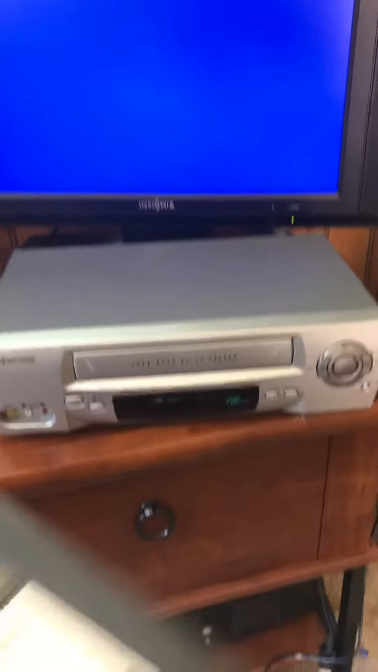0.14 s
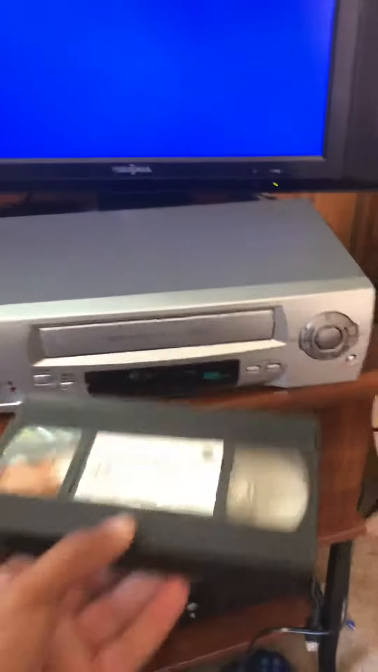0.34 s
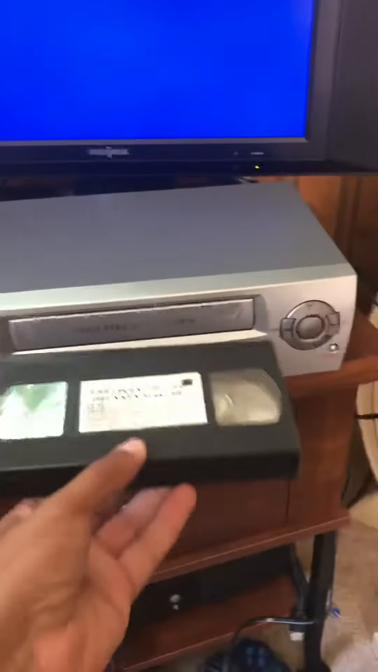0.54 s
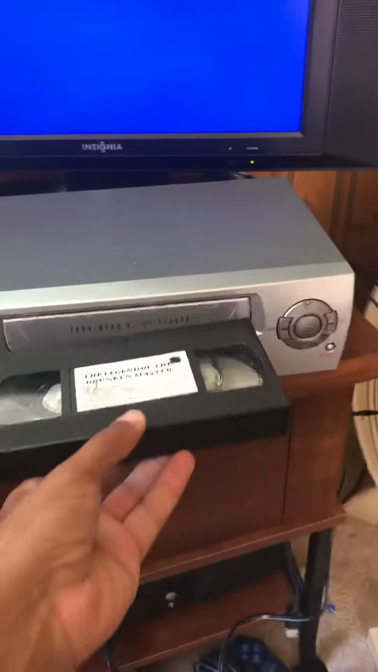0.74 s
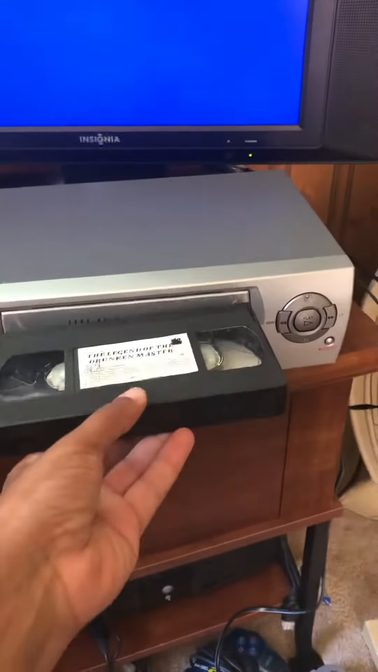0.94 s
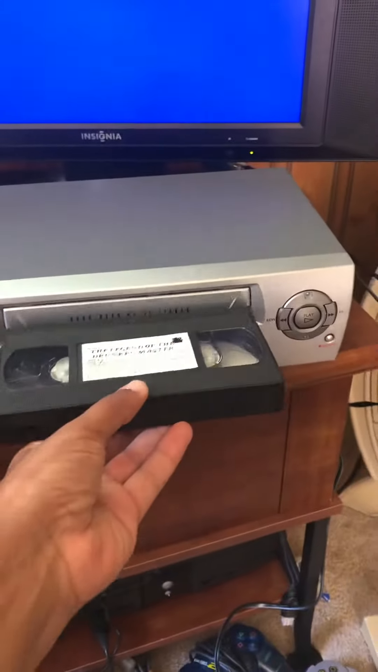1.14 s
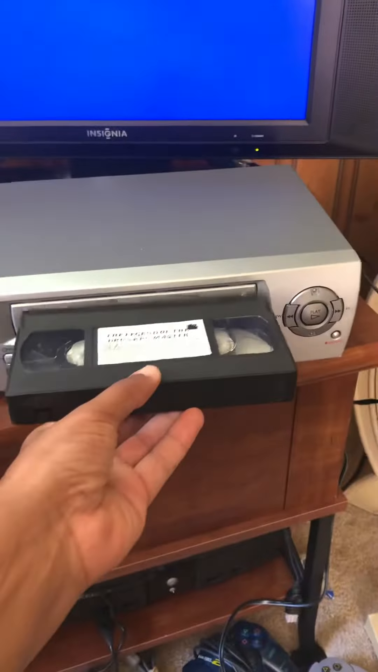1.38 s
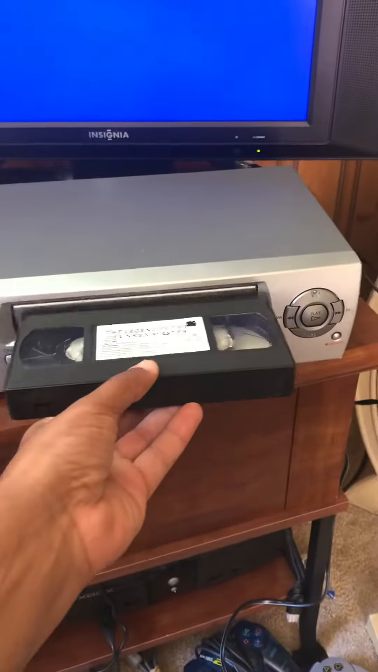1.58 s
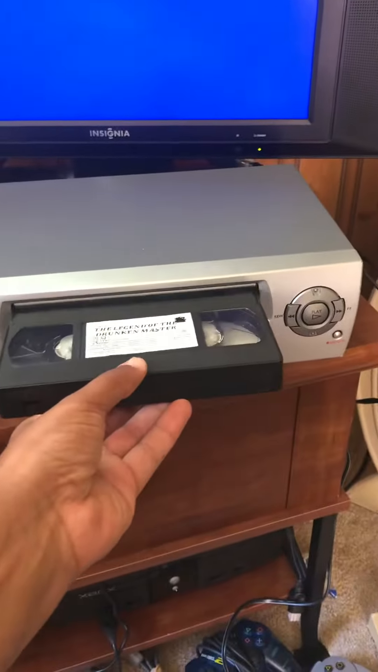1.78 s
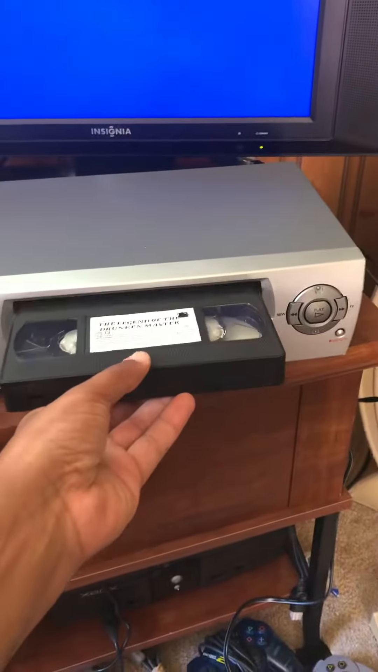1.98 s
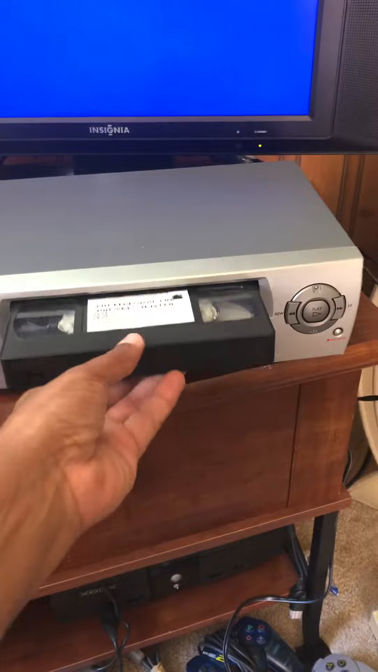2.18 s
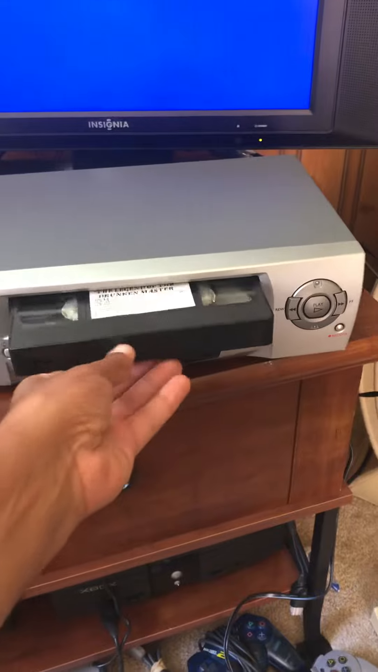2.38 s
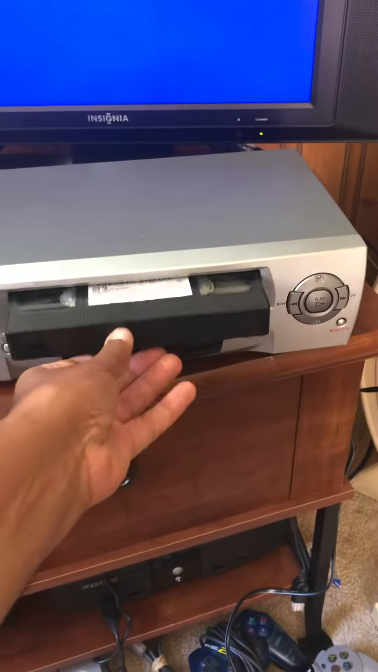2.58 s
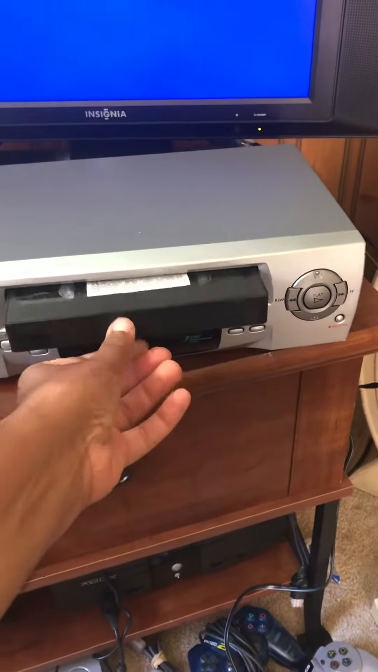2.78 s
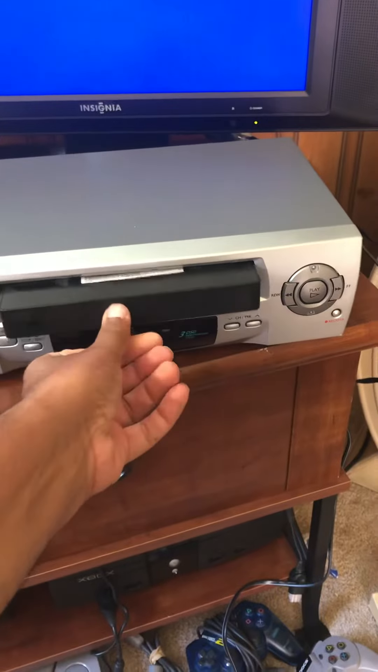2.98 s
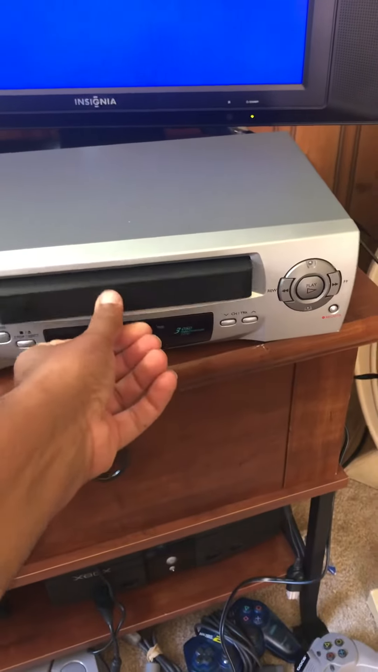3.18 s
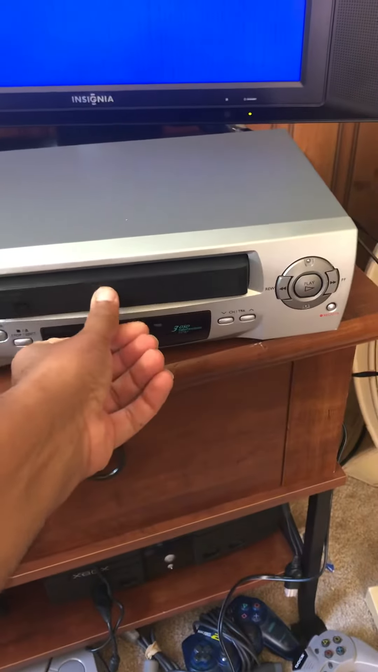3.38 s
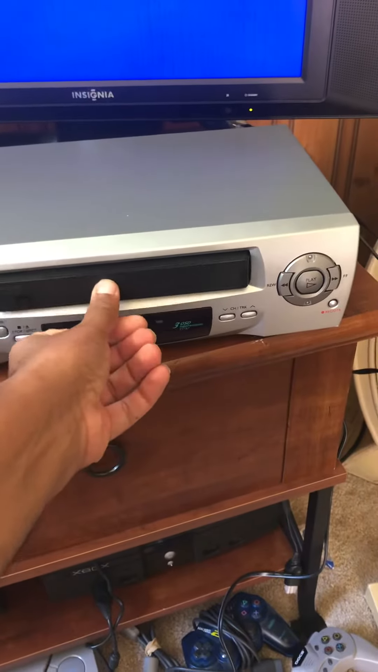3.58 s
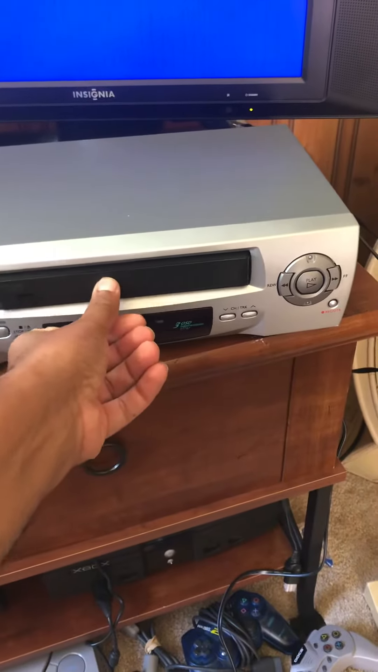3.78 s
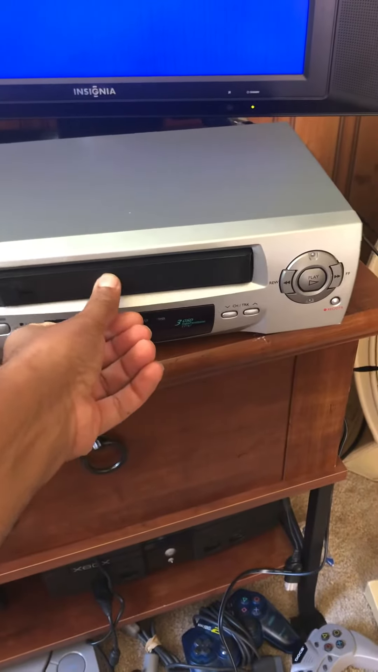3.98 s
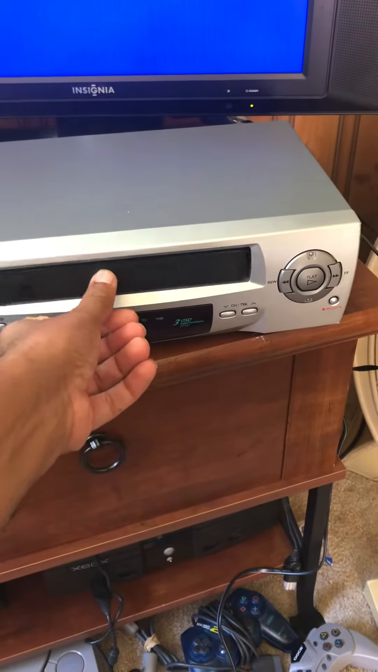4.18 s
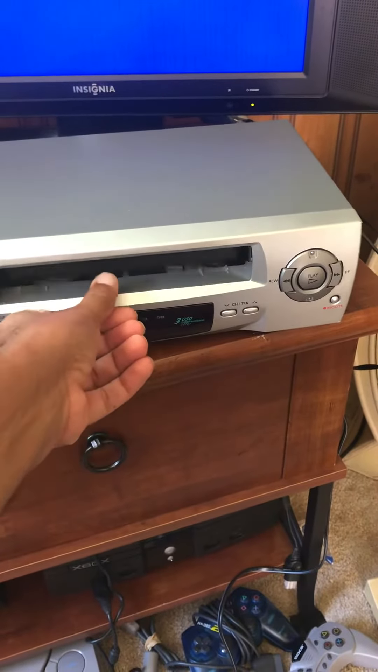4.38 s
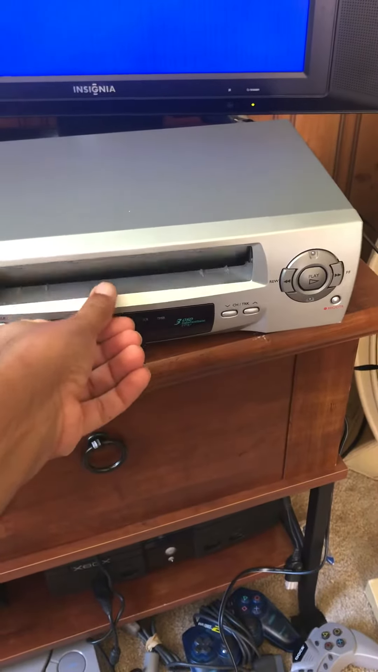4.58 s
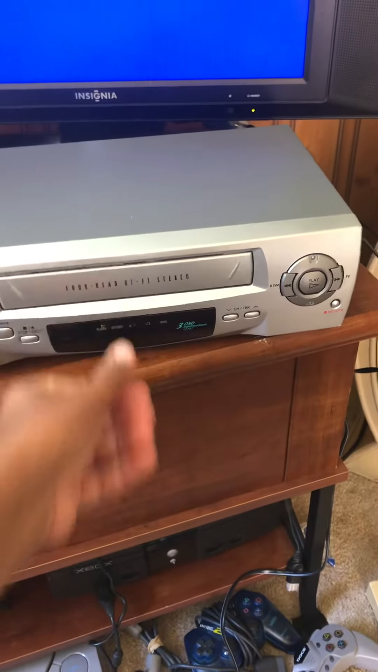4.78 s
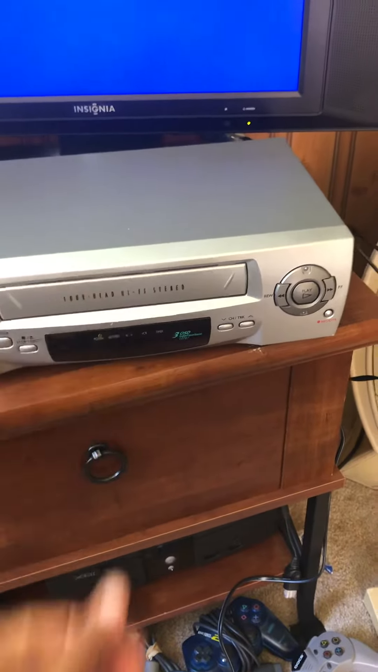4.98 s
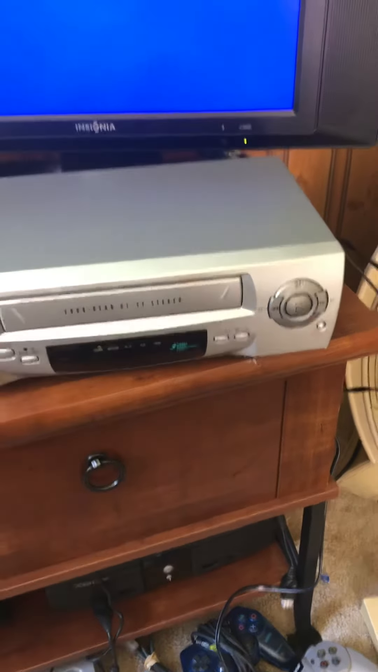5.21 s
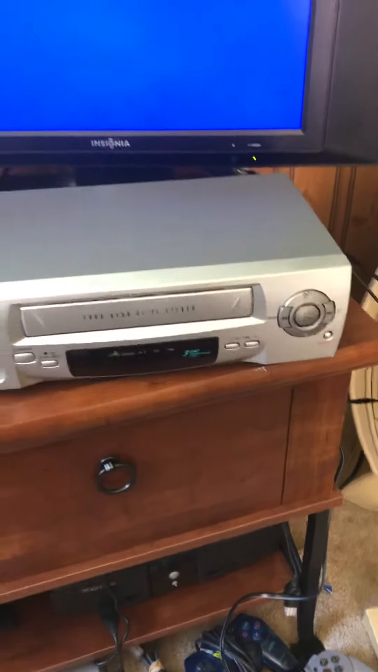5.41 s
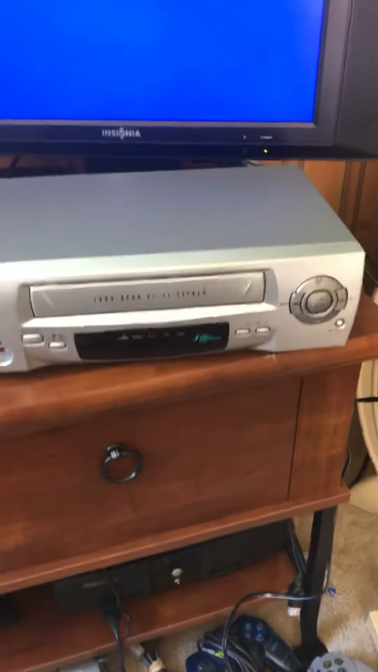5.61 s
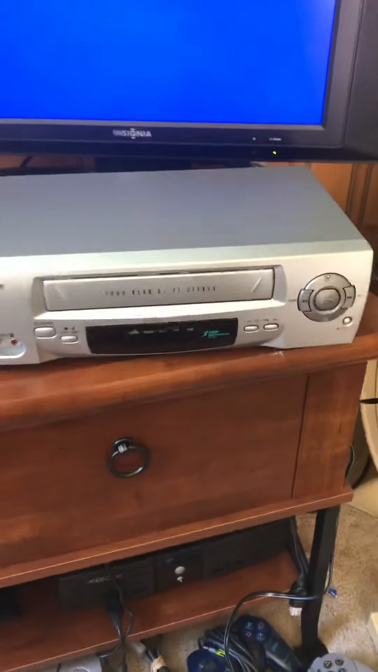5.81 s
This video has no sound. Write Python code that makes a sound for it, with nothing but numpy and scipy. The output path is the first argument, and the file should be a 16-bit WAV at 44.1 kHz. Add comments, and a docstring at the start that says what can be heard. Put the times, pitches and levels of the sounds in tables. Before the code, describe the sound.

A video cassette knocks and scrapes into a player's slot, then a geared motor whirs and clacks before the door flap slaps shut.

```python
"""A quiet room: a video cassette is pushed by hand into a VCR on a wooden cabinet.
Its plastic shell knocks and scrapes through the slot: struck modes and grains of rubbing noise.
A geared motor then draws the carriage in and drops it onto the deck, with tooth clicks, whine and drone.
The sprung door flap slaps shut and bounces on ringing modes of its own, and the motor runs out.
Under it lie single clicks, soft bumps, squeaks, room air, a faint hum and a rustling arm."""
import sys
import numpy as np
from scipy import signal
from scipy.fft import rfft, irfft, next_fast_len
from scipy.io import wavfile
from scipy.ndimage import map_coordinates

SR = 44100
rng = np.random.default_rng(int(sys.argv[2]) if len(sys.argv) > 2 else 0)


def log_audio(samples):
    """Write samples as a 16-bit WAV file to the path given in sys.argv[1]."""
    # one column per channel
    frames = np.atleast_2d(samples).T
    # limit to full scale, then quantise
    limited = np.clip(frames, -1, 1)
    pcm = np.round(limited * 32767).astype(np.int16)
    wavfile.write(sys.argv[1], SR, pcm)


N = 257984

# low modes of the chassis and lid: (frequency [Hz], relative level [dB], t60 [s])
CHASSIS_MODES = [(105, -17, .17), (168, -15, .13), (245, -6, .06), (284, 1, .07), (314, 1, .075),
                 (345, -4, .06), (377, -5, .1), (445, -4, .07), (478, -4, .08), (646, -7, .085),
                 (700, -9, .06), (760, -13, .05)]
# modes of the cassette shell and carriage plates: (frequency [Hz], relative level [dB], t60 [s])
PLATE_MODES = [(880, -3, .09), (1032, -2, .13), (1170, -2, .06), (1245, 0, .09), (1465, -1, .11),
               (1875, -2, .09), (2095, -2, .09), (2303, -4, .08), (2515, 0, .07), (2900, -4, .05),
               (3260, -6, .06), (3808, -6, .09), (4740, -4, .07), (6450, -8, .05)]
# spectrum of plastic scraping, also used for the rustle: (frequency [Hz], relative level [dB])
SCRAPE_SPECTRUM = [(300, -20), (700, 1.5), (1300, 0.5), (2500, -4.5), (4000, -6), (6000, -11),
                   (8500, -17.5), (11000, -22), (15500, -21)]

STROKE_ATTACK_S = 0.025  # a stroke of the hand gathers speed
SCRAPE_T60_S, DRONE_T60_S = 0.35, 0.48  # after it, the scrape dies sooner than the drone


def knocks():
    """The shell knocks in the slot; the cushioning hand takes the edge off its treble."""
    soft_hz = 10500
    shell = blows(corners(), PLATE_MODES, clack_db=-10.0, part_db=-12.0, part_width=0.21, part_t60=0.063,
                  ring_db=-22, thud_db=2, crack_db=-1.5, crack_life=0.57, thud_rise=0.0026,
                  hold=0.001, patchy_db=2.5)
    return signal.sosfilt(signal.butter(2, soft_hz, fs=SR, output="sos"), shell)


def corners():
    """One corner of the shell lands and then the other, so each knock is two contacts."""
    # knocks: (time [s], level [dB], second corner re first [dB], thud offset [dB],
    # crack offset [dB], pitch of the part under the first corner [Hz])
    shell_knocks = [(1.262, -35.5, 1, -7.5, -11, 1530), (1.3542, -36, -13, -9, -7.5, 1730),
                    (1.3994, -36, -3.5, -7, -13, 1960), (1.713, -42.5, 4.5, -10, -9.5, 950),
                    (1.7576, -37, 3.5, -14, -21, 1940), (1.842, -37.5, -11, -8, -14.5, 880),
                    (1.8617, -39.5, -29, -4, -47, 1090), (1.8933, -43, -12, -5, -33, 1070),
                    (2.0088, -36.5, -5, -7, -23, 1200), (2.0838, -33, -20, -6, -7, 1860),
                    (2.1304, -27.5, -5, -23, -12.5, 1230), (2.157, -43.5, -5.5, 3.5, 2, 1810),
                    (2.2081, -32.5, -0.5, -13.5, -13, 1940), (2.2568, -32, -1.5, -3.5, -12, 1880),
                    (2.3412, -34.5, -15, -9, -14, 1310), (2.508, -44.5, -9, 2, -17, 1010),
                    (2.5278, -39, -7, -3, -41, 1880)]
    clack_t60_s = .079
    lag_s, thud_lift_db, pitch_ratio = .009, 3.5, 1.34  # the second is later, heavier and higher
    rows = []
    for s, db, second_db, low_db, high_db, hz in shell_knocks:
        rows.append((s, db, low_db, high_db, hz, clack_t60_s))
        second = (s + lag_s, db + second_db, low_db + thud_lift_db, high_db, hz * pitch_ratio, clack_t60_s)
        rows.append(second)
    return rows


def sliding():
    """Plastic sticks and slips on the guides, first in the slot, then on the carriage rails."""
    # pushes through the slot:
    # (start [s], held until [s], scrape level [dB], chassis drone before trim [dB])
    slot_pushes = [(1.17, 1.21, -65.5, -60.5), (1.39, 1.44, -64.5, -54), (1.55, 1.615, -57.5, -59),
                   (1.72, 1.78, -60.5, -51), (1.895, 1.98, -52, -51), (1.97, 2.27, -50, -49),
                   (2.395, 2.47, -56.5, -52), (2.49, 2.55, -63.5, -54.5)]
    # the thumb presses the carriage back along its rails, lightly and then harder:
    # (start [s], held until [s], rub level [dB], chassis drone before trim [dB])
    thumb_presses = [(2.58, 2.92, -63.5, -63.5), (2.93, 3.09, -58.5, -60), (3.08, 3.22, -57.5, -58)]
    # spectrum of the rub on the rails: (frequency [Hz], relative level [dB])
    rail_spectrum = [(300, -10), (700, 7), (1000, -1), (1450, 4.5), (1750, 1), (2600, -4.5), (4500, -7.5),
                     (7000, -14), (15500, -27)]
    slot = grains(per_second=16000, spread_db=1.5) * amp(1.16 * wobble(rate=90))
    rails = grains(per_second=13000, spread_db=-0.5) * amp(0.53 * wobble(rate=31))
    release = SCRAPE_T60_S, DRONE_T60_S
    in_slot = housing(slot, strokes(slot_pushes, release), SCRAPE_SPECTRUM, plates_db=-12.0, chassis_db=0.5)
    on_rails = housing(rails, strokes(thumb_presses, release), rail_spectrum, plates_db=-14, chassis_db=2.0)
    return in_slot + on_rails


def drive(mesh_hz, waver, tooth_db, grind_db):
    """Gear teeth meet at a wavering rate and whine while the carriage grinds along its track."""
    # load as the drive draws the carriage in, lowers it and runs out:
    # (time [s], gear rattle level [dB], chassis drone before trim [dB])
    load = [(4.12, -75, -76), (4.215, -44, -47.5), (4.325, -49, -50.5), (4.41, -38, -47.5),
            (4.52, -41.5, -38), (4.575, -57, -55), (4.64, -49.5, -41.5), (4.79, -65.5, -53),
            (4.85, -63.5, -56.5), (4.92, -88, -74)]
    # spectrum of the gear rattle: (frequency [Hz], relative level [dB])
    gear_spectrum = [(300, -7), (700, -2), (1300, 7.5), (2600, -0.5), (3400, -0.5), (4200, -8),
                     (6000, -7.5), (10000, -18.5), (15500, -20)]
    # tones of the gear mesh: (multiple of the tooth rate [-], mid level re untrimmed drone [dB])
    mesh_tones = [(1, -25), (4, -19), (7, -22)]
    levels = gains(load)
    teeth = np.cumsum(mesh_hz * (1 + waver * wobble(rate=30))) / SR  # teeth passed so far
    tooth_passes = np.diff(np.floor(teeth), prepend=0)
    tooth_clicks = unit(tooth_passes * amp(tooth_db * rng.standard_normal(N)))  # uneven teeth
    grind = amp(grind_db) * grains(per_second=9000, spread_db=3.0)
    force = (tooth_clicks + grind) * amp(1.7 * wobble(rate=140))
    whine = np.zeros(N)
    for k, db in mesh_tones:
        whine += amp(db + 5.9 * wobble(rate=23)) * np.sin(2 * np.pi * k * teeth)
    rattle = housing(force, levels, gear_spectrum, plates_db=-8.0, chassis_db=-16.0)
    return rattle + levels[1] * whine


def flap():
    """The sprung door flap hits its stop and bounces, ringing in its own modes."""
    # slaps: (time [s], level [dB], thud offset [dB], crack offset [dB],
    # pitch of the struck part [Hz], clack t60 [s])
    slaps = [(4.592, -15.5, -14, -11.5, 1260, 0.13), (4.6518, -26.5, -13, -10, 2090, 0.16),
             (4.6814, -33, -26, -16, 1464, 0.071), (4.7034, -34.5, -22, -20, 1070, 0.24)]
    # modes of the door flap: (frequency [Hz], relative level [dB], t60 [s])
    flap_modes = [(844, -3, 0.22), (1185, -10, 0.074), (1290, 9, 0.078), (1760, -27, .1), (2040, 8, 0.077),
                  (2200, -14, 0.053), (3450, -11, 0.094), (3410, -8.5, 0.18), (4170, -17, 0.11),
                  (4600, 10.5, 0.068), (6000, -14, .05), (8450, -2, 0.074)]
    return blows(slaps, flap_modes, clack_db=-13.5, part_db=-16.5, part_width=0.059, part_t60=0.1,
                 ring_db=-13.5, thud_db=2.0, crack_db=0.5, crack_life=0.43, thud_rise=0.0033,
                 hold=0.0012, patchy_db=3.5)


def clicks():
    """Carriage, levers and handled shell click as short blows on the plates."""
    # clicks: (time [s], level [dB], thud offset [dB], crack offset [dB],
    # pitch of the struck part [Hz], clack t60 [s])
    single_clicks = [(0.049, -52, 1, -22, 1900, 0.16), (0.1055, -48, -25, -15, 3000, 0.13),
                     (2.8951, -41, -8, -33, 1430, 0.061), (2.9483, -36.5, -9, -17, 820, .04),
                     (3.0221, -37.5, -7.5, -16, 1240, .058), (3.0837, -33, -8, -32, 1260, 0.081),
                     (3.1187, -41, -17, -3.5, 1470, .07), (3.2047, -29, -16.5, -23, 1260, 0.031),
                     (3.2817, -34, -12.5, -14, 1220, 0.046), (3.5546, -57, -4, -12, 3100, .11),
                     (3.7133, -56.5, 2, -35, 1430, .2), (4.135, -54, -20, -30, 1400, .09),
                     (4.1861, -41.5, -3, -20, 1200, 0.063), (4.2124, -32.5, -16, -3, 1280, .07),
                     (4.343, -20.5, -42, -16, 2450, 0.043), (4.3479, -25, -23, -9, 2600, .09),
                     (4.3639, -28, -9, -24, 1210, 0.055), (4.3879, -30, -9, -3.5, 1240, 0.082),
                     (4.4269, -24.5, -20, -6.5, 1050, 0.11), (4.4425, -40, 3, -2, 1140, 0.21),
                     (4.4711, -35.5, -4, -1, 1200, 0.21), (4.4856, -22.5, -2.5, -5, 4730, 0.029),
                     (4.4958, -27, -2.5, -16, 1080, 0.055)]
    return blows(single_clicks, PLATE_MODES, clack_db=-11.0, part_db=-10.0, part_width=0.28, part_t60=0.061,
                 ring_db=-22.5, thud_db=3, crack_db=-3.0, crack_life=0.71, thud_rise=0.0033,
                 hold=0.0012, patchy_db=4.5)


def squeaks():
    """Smooth plastic chatters: fast stick-slip swells in one resonance and dies."""
    # squeaks: (middle [s], length [s], frequency [Hz], level before the swell [dB], relative width [-])
    chatters = [(1.244, 0.15, 12800, -75, .04), (2.008, 0.044, 6120, -53, 0.07),
                (4.214, 0.031, 6040, -41, 0.35), (4.443, 0.0098, 15800, -39, 0.033),
                (4.834, 0.067, 2610, -73, 0.038)]
    out = np.zeros(N)
    for s, length, hz, db, width in chatters:
        swell = np.hanning(round(length * SR))
        tone = narrow(hz, width, size=SR // 2)[:len(swell)]
        add(out, s - length / 2, amp(db) * tone * swell)
    return out


def bumps():
    """Soft contacts sound only one low mode each, a dying sine with a rounded onset."""
    # bumps: (time [s], level before onset and decay [dB], frequency [Hz], t60 [s])
    soft_bumps = [(1.184, -48, 324, .06), (2.26, -28, 292, 0.058), (2.573, -43, 325, 0.045),
                  (2.901, -37.5, 330, 0.069), (3.086, -27.5, 352, 0.048), (3.138, -36, 350, 0.039),
                  (3.251, -41.5, 361, 0.068), (4.492, -35, 127, 0.099), (4.497, -43, 78.3, 0.28),
                  (5.406, -40, 309, 0.049)]
    out, t = np.zeros(N), np.arange(SR // 3) / SR
    onset = 1 - np.exp(-t / 0.0011)
    for s, db, hz, t60 in soft_bumps:
        add(out, s, -amp(db) * np.sin(2 * np.pi * hz * t) * fade(t, t60) * onset)
    return out


def background():
    """Room air is shaped noise, the hum steady sines, the arm's rustle fine grains."""
    # spectrum of the room air: (frequency [Hz], relative level [dB])
    air_spectrum = [(25, -31), (45, 2), (80, -4), (120, -2.5), (200, -4.5), (320, -7), (500, -10.5),
                    (900, -15.5), (1650, -21.5), (3250, -25.5), (8000, -29.5), (16000, -33.5)]
    # steady hum in the room: (frequency [Hz], rms level [dB])
    hum_tones = [(118.4, -80), (301.5, -81)]
    # the arm draws back: (start [s], held until [s], rustle level [dB])
    arm_strokes = [(5.15, 5.62, -76.5), (5.67, 5.74, -65.5)]
    t = np.arange(N) / SR
    air = amp(-67.0) * colour(rng.standard_normal(N), air_spectrum)
    hum = sum(amp(db) * np.sqrt(2) * np.sin(2 * np.pi * hz * t) for hz, db in hum_tones)
    cloth = colour(grains(per_second=2800, spread_db=1.0), SCRAPE_SPECTRUM)
    rustle = strokes(arm_strokes, [SCRAPE_T60_S])[0] * cloth
    return air + hum + rustle


def room(x):
    """A small furnished room: a noise tail whose treble dies before its bass."""
    # reverberation: (frequency [Hz], t60 [s])
    reverb_times = [(150, 0.52), (600, 0.44), (2500, 0.14), (8000, 0.15), (16000, 0.18)]
    hz, t, z = signal.stft(rng.standard_normal(SR // 2), SR, nperseg=256)
    tail = signal.istft(z * fade(t, along(reverb_times, hz)[:, None]), SR, nperseg=256)[1]
    tail *= 1 - np.exp(-np.arange(len(tail)) / SR / 0.003)  # the reflections build up
    return signal.fftconvolve(x, tail / np.linalg.norm(tail))[:N]


def blows(rows, modes, clack_db, part_db, part_width, part_t60, ring_db, thud_db, crack_db, crack_life,
          thud_rise, hold, patchy_db):
    """Each contact: bright crack, clack of dense modes, struck part's ring, plates, slower chassis thud."""
    # spectra of the clack and of the crack: (frequency [Hz], relative level [dB])
    clack_spectrum = [(150, -30), (400, -3.5), (700, 7.5), (1300, 4.5), (2500, 2), (4500, -5.5),
                      (7000, -18.5), (11000, -38), (16000, -38)]
    crack_spectrum = [(1500, -12), (4000, 7), (6500, 9), (9000, 5), (11500, 2.5), (15500, 4)]
    out, t = np.zeros(N), np.arange(SR // 4) / SR
    dense = patches(rng.standard_normal(N + SR), patchy_db, hz_step=322.0, life=.07)
    free = np.hypot(t, hold) - hold  # clack and part hold near full level for a few ms before they decay
    build = 1 - np.exp(-t / 0.0012)  # the plastic takes a moment to ring; the crack is instant
    thud_build = 1 - np.exp(-t / thud_rise)
    for s, db, low_db, high_db, hz, t60 in rows:
        buzz = dense[round(s * SR):][:len(t)]
        clack = amp(clack_db) * colour(buzz, clack_spectrum) * fade(free, t60)
        crack = amp(crack_db + high_db) * colour(buzz, crack_spectrum) * fade(t, t60 * crack_life)
        part = amp(part_db) * narrow(hz, part_width, size=len(t)) * fade(free, part_t60)
        plates = amp(ring_db) * ring(modes, t, scatter_db=7.5)
        thud = amp(thud_db + low_db) * ring(CHASSIS_MODES, t, scatter_db=6.0, spread=0.68) * thud_build
        add(out, s, amp(db) * (crack + build * (clack + part + plates + thud)))
    return out


def housing(force, levels, spectrum, plates_db, chassis_db):
    """Rubbing heard through the housing: plastic hisses, plates ring, the chassis shudders unevenly."""
    # spectrum of the chassis drone: (frequency [Hz], relative level [dB])
    drone_spectrum = [(60, -30), (130, -10.5), (220, -7), (300, -4), (380, 4.5), (470, -6), (545, -6.5),
                      (670, -1), (900, -27), (1500, -75)]
    treble, drone = levels
    rubbed = patches(force, depth_db=3, hz_step=453, life=.014)
    hiss = colour(rubbed, spectrum)
    shell = unit(hiss + amp(plates_db) * through(colour(force, spectrum), PLATE_MODES))
    low = colour(force, drone_spectrum)
    shudder = amp(2.84 * wobble(rate=55))
    body = unit((low + amp(chassis_db) * through(low, CHASSIS_MODES)) * shudder)
    return treble * shell + amp(-0.5) * drone * body  # the drone is trimmed by half a dB


def grains(per_second, spread_db):
    """Tiny catches of rough surfaces, at random times and in uneven sizes, at rms 1."""
    caught = rng.random(N) < per_second / SR
    return unit(caught * rng.standard_normal(N) * amp(spread_db * rng.standard_normal(N)))


def patches(x, depth_db, hz_step, life):
    """The contact point moves, so the modes it excites keep changing in strength."""
    hz, t, z = signal.stft(x, SR, nperseg=256)
    knots = rng.standard_normal((300, 900))
    places = np.meshgrid(hz / hz_step, t / life, indexing="ij")
    field = map_coordinates(knots, places, order=1, mode="wrap")
    return unit(signal.istft(z * amp(depth_db * field), SR, nperseg=256)[1][:len(x)])


def ring(modes, t, scatter_db, spread=1.0):
    """Damped modes, scattered in level and, by spread in turns, in phase each time they are struck."""
    hz, db, t60 = np.transpose(modes)
    size = amp(db + scatter_db * rng.standard_normal(len(hz)))
    phase = 2 * np.pi * (hz[:, None] * t + spread * rng.random((len(hz), 1)))
    return size @ (np.sin(phase) * fade(t, t60[:, None])) / np.sqrt(np.sum(size ** 2) / 2)


def through(x, modes):
    """x sounding through a set of damped modes, at rms 1."""
    response = ring(modes, np.arange(SR // 4) / SR, scatter_db=5.5, spread=0)
    return unit(signal.fftconvolve(x, response)[:N])


def narrow(hz, width, size):
    """Noise in one resonance of the given relative width, at rms 1."""
    b, a = signal.iirpeak(min(hz, SR / 2 - 1), 1 / width, SR)
    noise = signal.filtfilt(b, a, rng.standard_normal(2 * size))
    return unit(noise[size // 2:][:size])


def colour(x, spectrum):
    """x shaped by a spectrum, at rms 1."""
    m = next_fast_len(len(x) + 4096)
    curve = amp(along(spectrum, np.fft.rfftfreq(m, 1 / SR)))
    return unit(irfft(rfft(x, m) * curve, m)[:len(x)])


def strokes(rows, t60s):
    """A gain per sample for each dB column: every stroke swells, holds and dies with that column's t60."""
    t = np.arange(N) / SR
    start, end, *levels = np.transpose(rows)[:, :, None]
    swell = np.clip((t - start) / STROKE_ATTACK_S, 0, 1)
    since_end = np.maximum(t - end, 0)
    # where strokes overlap, the louder one counts
    return [np.max(amp(db) * swell * fade(since_end, t60), axis=0) for db, t60 in zip(levels, t60s)]


def gains(rows):
    """A gain per sample for each dB column, practically silent outside the rows."""
    s, *cols = np.transpose(rows)
    t = np.arange(N) / SR
    return [amp(np.interp(t, s, c, left=-140, right=-140)) for c in cols]


def wobble(rate):
    """A smooth random curve, rate knots a second."""
    knots = rng.standard_normal(int(N * rate / SR) + 4)
    return map_coordinates(knots, [np.arange(N) * rate / SR])


def fade(t, t60):
    """Exponential decay by 60 dB in t60, which is kept to 3 ms or more."""
    return amp(-60 * t / np.maximum(t60, .003))


def along(points, hz):
    """(Hz, value) points read on a log frequency axis."""
    f, v = np.transpose(points)
    return np.interp(np.log(hz + 1), np.log(f), v)


def amp(db):
    """Decibels to gain."""
    return 10 ** (np.asarray(db) / 20)


def unit(x):
    """x at rms 1."""
    return x / np.sqrt(np.mean(x ** 2) + 1e-20)


def add(track, s, sound):
    """Mix a sound into the track at time s."""
    start = max(round(s * SR), 0)
    track[start:start + len(sound)] += sound[:N - start]


def scene():
    """Cassette, drive and flap excite the room; bumps and background join without its reverberation."""
    motor = drive(mesh_hz=371, waver=0.028, tooth_db=1.0, grind_db=9.5)
    direct = knocks() + clicks() + flap() + sliding() + squeaks() + motor
    return (direct + amp(-11.5) * room(direct) + bumps() + background())[None]


def record(dry):
    """The phone cuts the deep bass and keeps nothing above its band limit."""
    top_hz = 15900
    m = next_fast_len(N + 4096)
    heard = signal.sosfilt(signal.butter(6, 38, "high", fs=SR, output="sos"), dry)
    passed = np.fft.rfftfreq(m, 1 / SR) < top_hz
    return irfft(rfft(heard, m) * passed, m)[:, :N]


dry = scene()
out = record(dry)
log_audio(out)
```